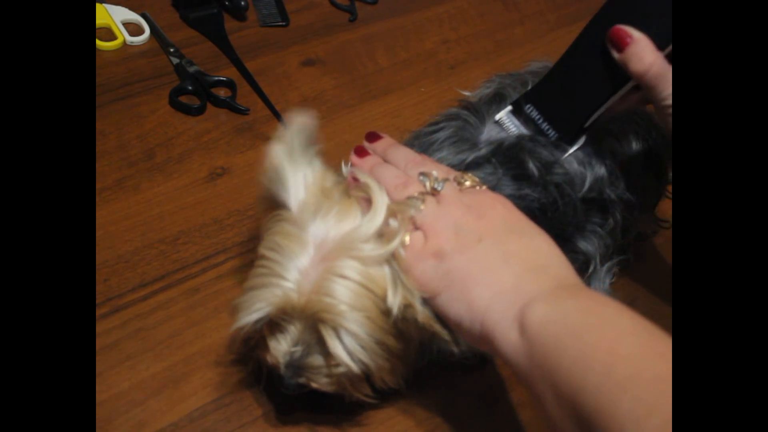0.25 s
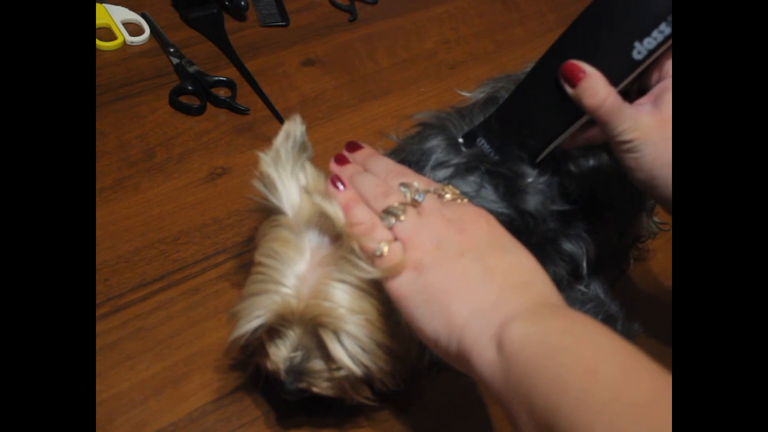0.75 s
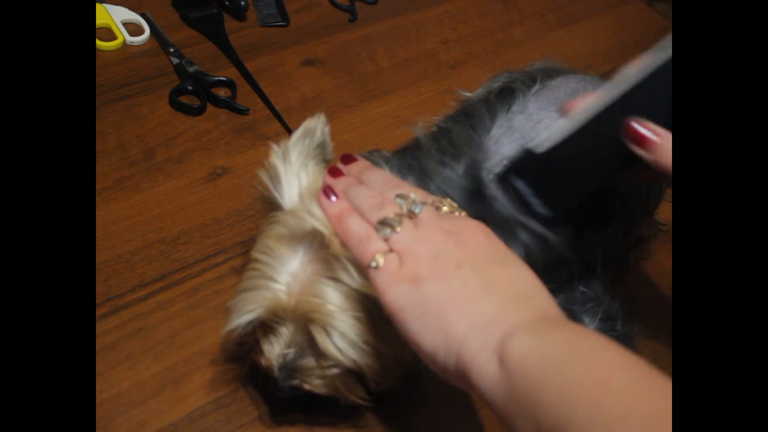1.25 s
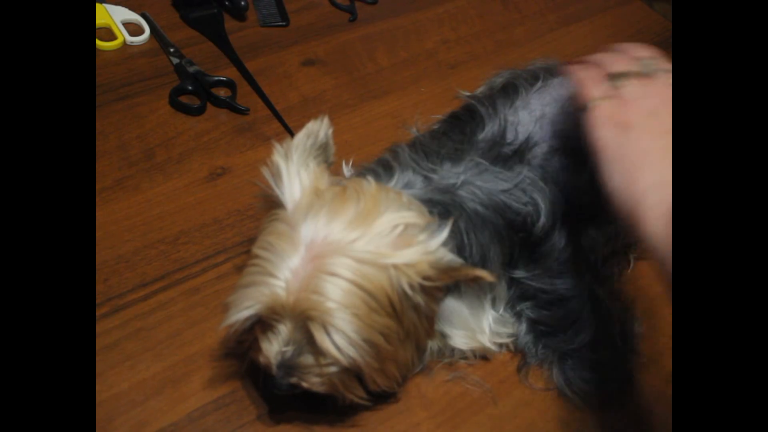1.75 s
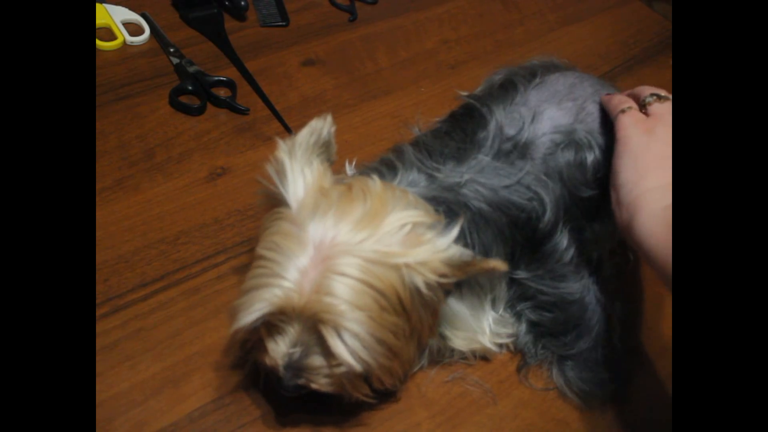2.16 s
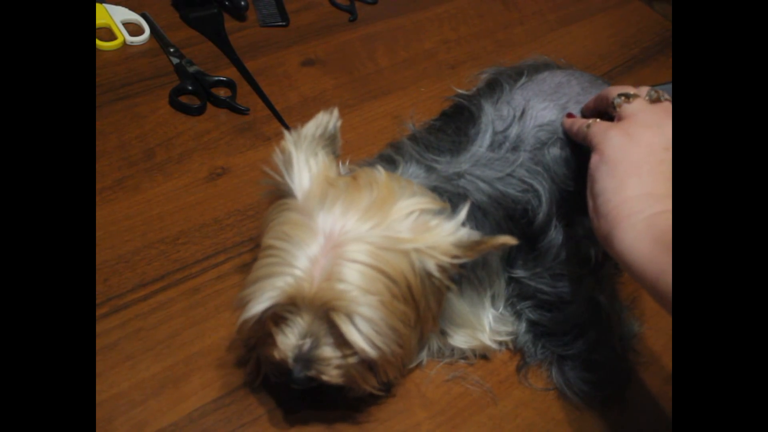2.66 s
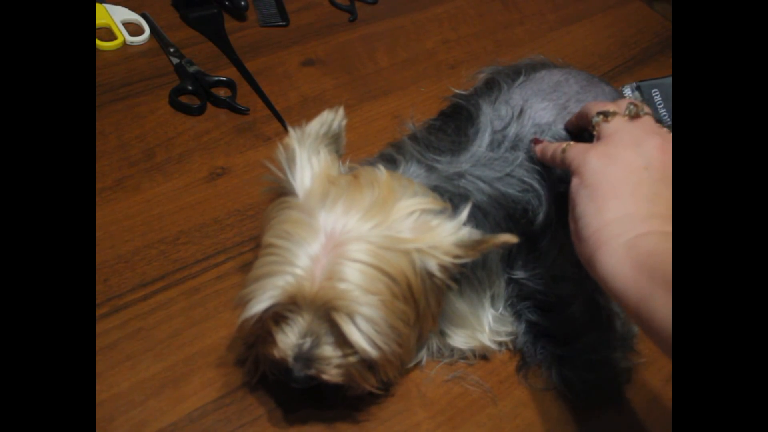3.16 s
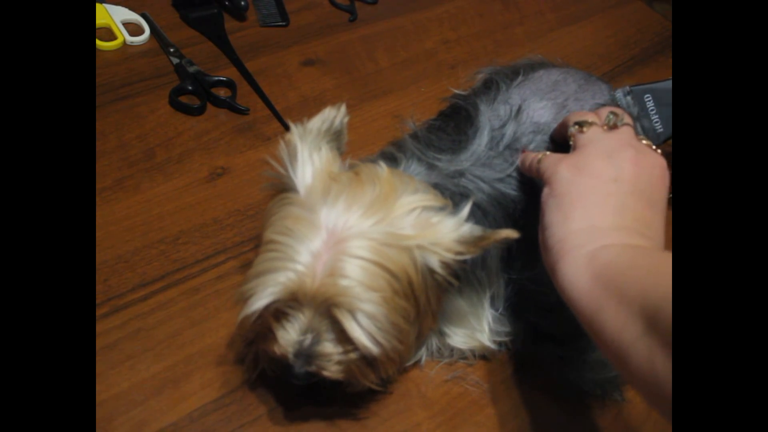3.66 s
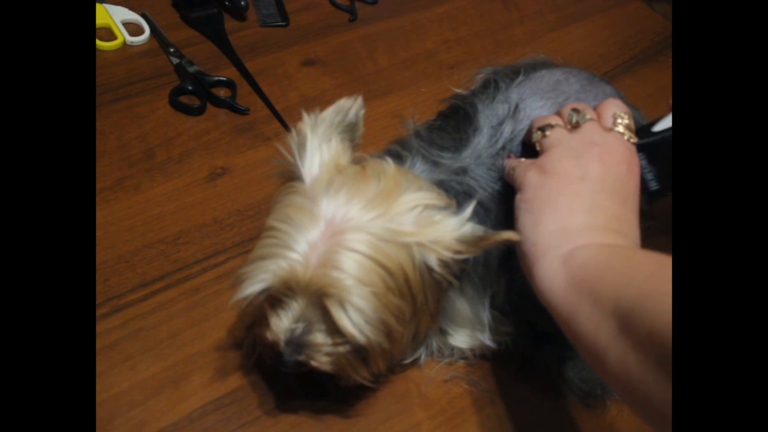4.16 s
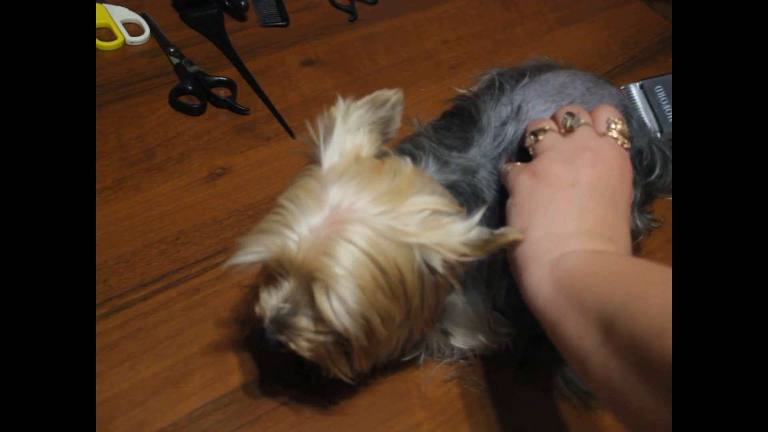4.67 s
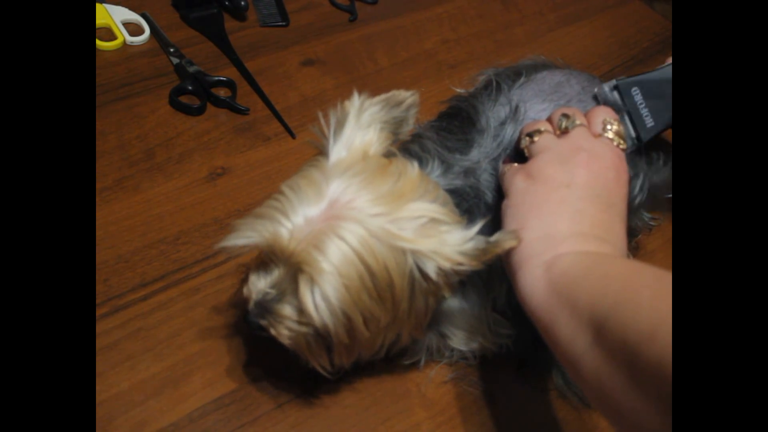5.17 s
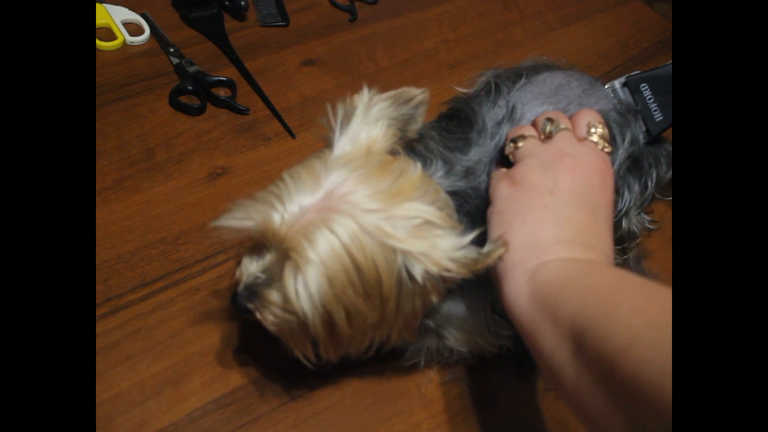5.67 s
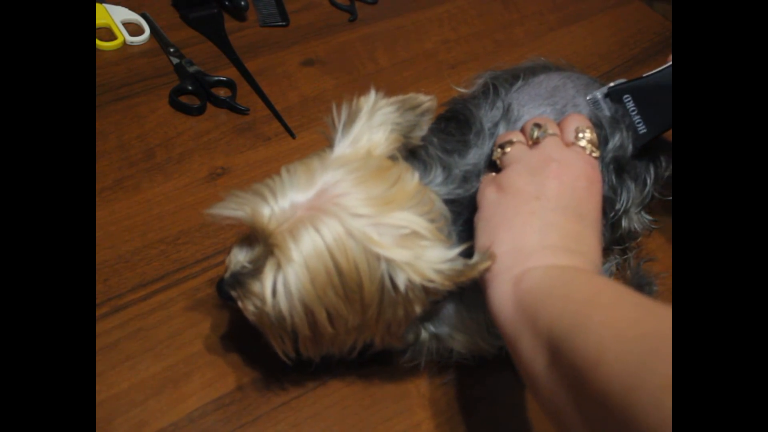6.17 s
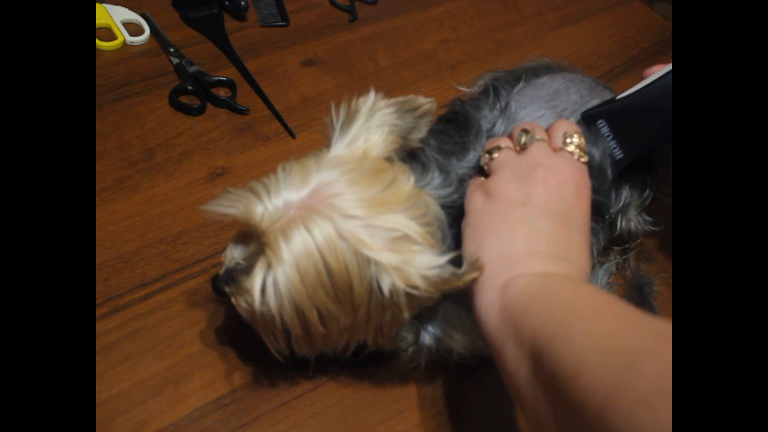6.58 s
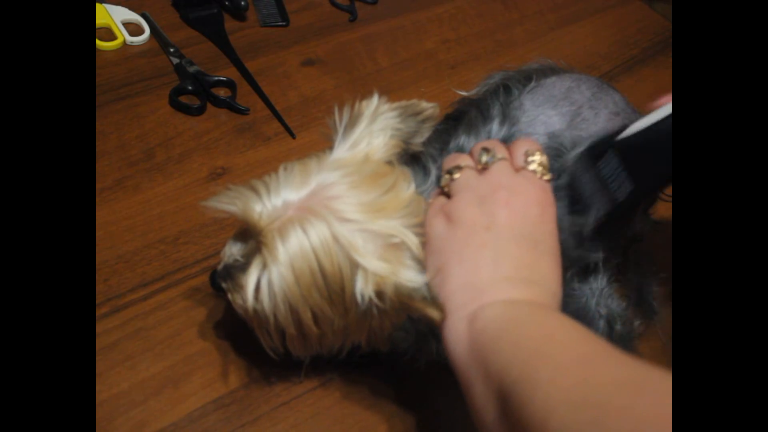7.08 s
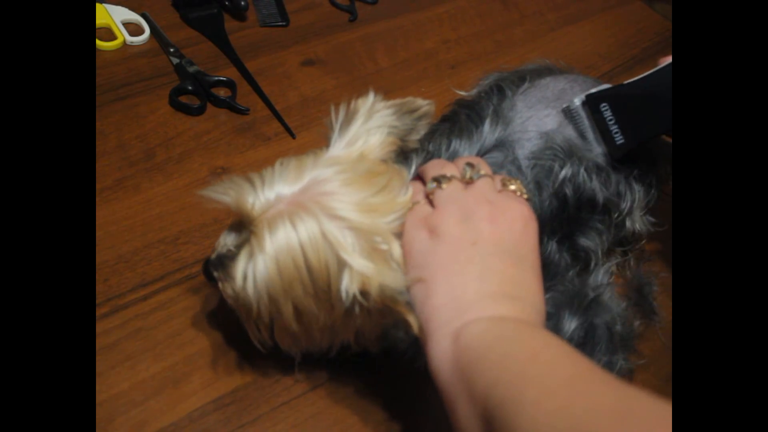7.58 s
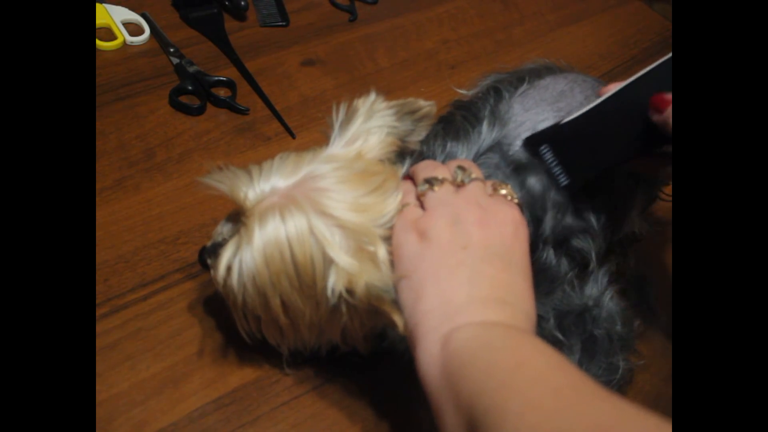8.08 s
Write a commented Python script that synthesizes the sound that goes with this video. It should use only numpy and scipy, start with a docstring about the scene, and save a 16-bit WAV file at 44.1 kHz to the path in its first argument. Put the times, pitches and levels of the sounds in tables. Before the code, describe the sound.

Close up in a quiet room, a running electric clipper shaves a small dog. A steady, slightly wavering high whine carries buzzy gear rattle and crisp blade hiss. It throbs roughly in thick hair at first, chatters loosely as it lifts, then settles into smoother pressed cutting. Near the end the whine dips and strained rattling returns, with faint soft bumps.

```python
"""An electric clipper shaves a small dog in a quiet room, heard close up; both channels are alike.
0-1.1 s: the gears whine at the tooth rate, near 1439 Hz and sagging; hard cuts in thick hair throb and rattle.
1.3-1.9 s: the loose cutter chatters and a soft bump is heard; 2.1-5.9 s: presses and cuts, bumps near 4 and 5.9 s.
6.8-8.3 s: the whine dips, strained cuts rattle again, the cutter chatters and two last bumps follow.
Throughout: wheel tones, housing and blade noise from tooth knocks and scraping, faint rumble and hum."""
import sys
import numpy as np
from scipy import signal
from scipy.fft import rfft, irfft, next_fast_len
from scipy.io import wavfile
from scipy.ndimage import uniform_filter1d, map_coordinates

SR = 44100
rng = np.random.default_rng(int(sys.argv[2]) if len(sys.argv) > 2 else 0)


def master(y):
    """Save y as 16-bit WAV."""
    cut = np.clip(np.atleast_2d(y).T, -1, 1)
    pcm = np.round(cut * 32767)  # scale
    wavfile.write(sys.argv[1], SR, pcm.astype(np.int16))


N = 367353

# motor speed, sagging under load: (time [s], tooth rate [Hz])
TOOTH_RATE = [(0.0, 1439.0), (1.08, 1436.0), (1.2, 1432.4), (1.92, 1434.5), (2.2, 1430.6), (2.96, 1427.8),
              (3.44, 1432.9), (3.72, 1428.9), (4.12, 1428.7), (4.29, 1423.4), (4.73, 1431.4),
              (5.33, 1430.4), (5.45, 1433.1), (6.29, 1428.5), (6.49, 1422.9), (7.17, 1424.0),
              (7.29, 1428.9), (8.33, 1429.9)]


def gear_mesh():
    """Teeth passed so far: the integral of the tooth rate."""
    return np.cumsum(curve(TOOTH_RATE)) / SR


# whine swells and fades as the clipper turns in the hand: (time [s], level before trim [dB])
WHINE_LEVEL = [(0.0, -27), (1.36, -22), (1.68, -30), (1.76, -22), (2.04, -20), (2.6, -28), (3.28, -21),
               (3.92, -18), (5.13, -20.5), (6.53, -19), (6.81, -24), (6.89, -35), (7.01, -23.5),
               (7.13, -33), (7.25, -23), (7.61, -22.7), (8.21, -29), (8.33, -24)]


def whine_level_db():
    """Level of the whine as the clipper turns in the hand."""
    return curve(WHINE_LEVEL)


USUAL_WHINE_DB, THROB_DB = -22.5, -29  # throb before trim, at the usual whine
THROB_PER_WHINE_DB, THROB_PER_STRAIN_DB = 0.69, 1.95  # [dB/dB]


def throb_level_db(whine_db, strain_db):
    """Throb of the blade strokes: it follows the whine and grows with strain."""
    from_whine = THROB_PER_WHINE_DB * (whine_db - USUAL_WHINE_DB)
    return THROB_DB + from_whine + THROB_PER_STRAIN_DB * strain_db


# free gears: a stroke mostly bends the whine's phase; strain skews that into level pulsing
FREE_SKEW_RAD, SKEW_RAD_PER_STRAIN_DB = 0.29, 1.2


def whine(mesh, whine_db, strain_db):
    """Tooth tone; each blade stroke holds the wheels back and lets them go, adding two side tones."""
    tooth = 2 * np.pi * mesh
    stroke = tooth / WHEEL_TEETH[0]
    skew = FREE_SKEW_RAD + SKEW_RAD_PER_STRAIN_DB * strain_db
    tone = np.sin(tooth + walk(40) / 20) * undb(whine_db + 2.45 + 0.56 * walk(25.03))
    sidebands = np.sin(tooth + stroke) - 0.79 * np.sin(tooth - stroke + skew)
    throb = sidebands * undb(throb_level_db(whine_db, strain_db) - 3.0)
    return np.sqrt(2) * (tone + throb)


# tones of uneven wheels: (teeth on the wheel, cycles per turn, level over control [dB], control)
UNEVEN_WHEEL_TONES = [(20, 4, -42, "housing"), (20, 5, -38, "housing"), (20, 7, -28.5, "housing"),
                      (20, 10, -21, "press"), (18, 11, -20, "stroke"), (22, 14, -9.5, "housing"),
                      (22, 16, -10, "housing"), (20, 16, -16, "press"), (20, 18, -36, "rattle"),
                      (29, 28, -9.5, "rattle"), (40, 39, -9, "rattle"), (40, 41, -11.5, "rattle"),
                      (29, 30, -16.5, "rattle"), (22, 24, -18, "rattle"), (20, 22, -9, "stroke"),
                      (22, 25, -19, "rattle"), (20, 23, -16, "rattle"), (22, 26, -15, "rattle"),
                      (20, 24, -14, "press"), (22, 28, -15.5, "rattle"), (22, 37, -19.5, "plate"),
                      (20, 40, -12, "plate"), (40, 81, -7.5, "plate"), (29, 59, -7, "plate"),
                      (20, 41, -15.5, "plate"), (40, 85, -21, "plate"), (20, 61, -6, "press")]


def wheel_tones(mesh, control_db):
    """Multiples of each wheel's turning rate, wavering with the part that drives or radiates them."""
    out = np.zeros(N)
    for teeth, cycles, db, control in UNEVEN_WHEEL_TONES:
        phase = 2 * np.pi * (cycles / teeth * mesh + rng.random())
        out += np.sin(phase) * undb(db + control_db[control] + 2 * walk(4.026))
    return np.sqrt(2) * out


# teeth on each wheel; the first drives the blade, one stroke a turn
WHEEL_TEETH = (20, 18, 22, 29, 40)


def tooth_knocks(mesh, repeat, memory, jitter):
    """One knock per tooth, signed by flank: flaws recur each turn, play in the teeth adds chance."""
    tooth = np.arange(1, int(mesh[-1]))
    chance = rng.standard_normal((N // 20, 2))[tooth]
    flaws = 0
    for teeth in WHEEL_TEETH:
        wheel_flaws = unit(signal.detrend(rng.standard_normal(teeth)))
        flaws = flaws + wheel_flaws[tooth % teeth] / 2
    force = repeat * flaws + chance[:, 0]
    # inertia carries a push over to the next teeth
    force = signal.lfilter([1], [1, -np.clip(memory, 0, .9)], force)
    # jitter in teeth; knocks land between samples
    at = np.clip(np.interp(tooth + jitter * chance[:, 1], mesh, np.arange(N)), 0, N - 2)
    whole, part = at.astype(int), at % 1
    early = np.bincount(whole, force * (1 - part), N)
    late = np.bincount(whole + 1, force * part, N)
    return unit(early + late)


def scrape(mesh, depth):
    """Steel sliding on steel: noise, harder at the same points of every turn of the last wheel."""
    turn = 2 * np.pi * mesh / WHEEL_TEETH[-1]
    pressure = np.zeros(N)
    for k, share in enumerate((0.2, 0.33, 0.33, 0.53, 0.46), 1):
        pressure += share * np.cos(k * turn + rng.uniform(0, 2 * np.pi))
    return unit(rng.standard_normal(N) * np.exp(depth * pressure))


# outlines of housing and gear case: (frequency [Hz], relative level [dB])
HOUSING_OUTLINE = [(100, -38), (300, -38.5), (480, -25), (600, -14), (700, -7.5), (810, -9), (940, 2),
                   (1150, -5), (1350, -26), (2000, -36)]
RATTLE_OUTLINE = [(500, -36), (1000, -16.5), (1250, -6), (1430, 1.5), (1700, -1), (2200, -1), (2600, -2),
                  (2900, -7), (3300, -1.5), (3800, -6.5), (4400, -2.5), (7000, -46)]
# blade plate modes: (frequency [Hz], nominal width [Hz], relative level [dB])
PLATE_MODES = [(2795, 200, -1), (2955, 186, 0)]


def gear_rattle(mesh, housing_db, rattle_db, plate_db):
    """Tooth knocks ring the housing; knocks with sliding noise ring the gear case and blade plate."""
    housing = colour(tooth_knocks(mesh, repeat=.5, memory=0.065, jitter=0.18), HOUSING_OUTLINE)
    knocks = tooth_knocks(mesh, repeat=0.66, memory=0.44, jitter=0.062)
    knocks = knocks + 0.49 * scrape(mesh, depth=.12)
    case = colour(knocks, RATTLE_OUTLINE) * undb(rattle_db + 2.5)
    plate = ring(knocks, PLATE_MODES) * undb(plate_db - 4.5)
    return housing * undb(housing_db - 2.5) + case + plate


# blade hiss outline: (frequency [Hz], relative level [dB])
BLADE_OUTLINE = [(2000, -35), (3500, -3), (4000, -4), (4350, 2), (4800, -7), (5300, -6.5), (5800, -6),
                 (6400, -7), (7000, -14), (8200, -12), (8750, -8), (9400, -13), (10100, -11.5),
                 (12000, -23.5), (13500, -30.5), (15000, -47)]
# modes of pressed comb and shell, and of loose cutter: (frequency [Hz], nominal width [Hz], relative level [dB])
PRESSED_MODES = [(695, 74, -5.5), (2180, 224, 1), (3164, 133, 3.5), (4325, 190, 2.5), (5720, 230, 1),
                 (8820, 280, -8.5)]
LOOSE_MODES = [(1720, 260, 1), (3170, 200, 0), (3060, 130, -2), (4330, 280, -1)]
# unloaded cutter chatters loosely: (peak time [s], length [s], level [dB])
CHATTER_SWELLS = [(1.3, 0.16, -25), (1.43, 0.11, -21.5), (1.64, 0.3, -24), (1.88, 0.12, -34),
                  (7.17, 0.14, -22), (7.75, 0.16, -32), (8.12, 0.22, -32)]


def blades(mesh, hiss_db, press_db):
    """Cutter ticks at every tooth and hisses on the comb; pressed it rings, unloaded it chatters."""
    ticks = tooth_knocks(mesh, repeat=0.61, memory=0.38, jitter=0.023)
    hiss = colour(ticks + scrape(mesh, depth=.2), BLADE_OUTLINE) * undb(hiss_db - 0.56)
    rubbing = tooth_knocks(mesh, repeat=0.99, memory=0.12, jitter=0.038)
    rubbing = rubbing + 0.78 * scrape(mesh, depth=.2)
    pressed = ring(rubbing, PRESSED_MODES) * undb(press_db + 1.0)
    chatter = ring(rubbing, LOOSE_MODES) * swells(CHATTER_SWELLS)
    return hiss + pressed + chatter


# shared opening curve, lower when the coat covers the blades: (time [s], level before offsets [dB])
OPENING = [(0.0, -28), (0.3, -28.5), (0.49, -28), (1.14, -31), (1.62, -28.5), (1.88, -28.5), (2.02, -27.5),
           (3.25, -27.5), (4.06, -30), (4.41, -30.5), (4.57, -29), (5.29, -28.5), (5.68, -27.5),
           (5.98, -29), (7.14, -27.5), (8.33, -27.5)]
BLADES_OFFSET_DB, RATTLE_OFFSET_DB, HOUSING_OFFSET_DB = 4.2, 2.5, -7  # over the opening curve
# cuts in thick hair: (start [s], end [s], plate ring before trim [dB], strain as rattle rise [dB])
THICK_CUTS = [(0, 0.246, -24.5, 2), (0.373, 1.064, -21, 2), (1.412, 1.44, -25.5, -0.5),
              (1.623, 1.677, -22, 0.5), (2.4, 3.3, -25.5, -1), (4.6, 5.9, -29.5, 0),
              (6.798, 7.18, -25.5, 1.7), (7.27, 8.02, -28.5, 1.7), (8.11, 8.26, -23.5, 1.8)]
IDLE_PLATE_DB, CUT_EDGE_S = -30, 0.13
HOUSING_PER_PLATE_DB = 0.42  # [dB/dB] the plate shakes the housing
# comb pressed on the body: (start [s], end [s], ring before trim [dB])
COMB_PRESSES = [(0, 1.35, -32), (2.15, 3.0, -26), (3.1, 3.85, -28.5), (4.6, 4.95, -29), (5.55, 5.75, -30.5),
                (7.1, 7.55, -33)]
LIGHT_TOUCH_DB, PRESS_EDGE_S = -35.5, 0.21
TREMOR_DB, TREMOR_PER_S = .35, 7  # unsteady hand


def handling():
    """Strain and levels of housing, rattle, plate, hiss and pressed ring [dB], as the coat is worked."""
    cuts, presses = np.array(THICK_CUTS), np.array(COMB_PRESSES)
    open_db = curve(OPENING) + TREMOR_DB * walk(TREMOR_PER_S)
    plate_db = holds(cuts[:, :2], cuts[:, 2], IDLE_PLATE_DB, CUT_EDGE_S)
    strain_db = holds(cuts[:, :2], cuts[:, 3], 0, CUT_EDGE_S)
    press_db = holds(presses[:, :2], presses[:, 2], LIGHT_TOUCH_DB, PRESS_EDGE_S)
    housing_db = open_db + HOUSING_OFFSET_DB + HOUSING_PER_PLATE_DB * (plate_db - IDLE_PLATE_DB)
    rattle_db = open_db + RATTLE_OFFSET_DB + strain_db
    hiss_db = open_db + BLADES_OFFSET_DB
    return strain_db, housing_db, rattle_db, plate_db, hiss_db, press_db


def disperse(x, spread_s):
    """Bending waves cross the shell at different speeds, smearing each knock."""
    size = next_fast_len(N + 4096)
    hz = np.arange(size // 2 + 1) * SR / size
    knots_hz = np.linspace(0, SR / 2, 128)
    delay_s = spread_s * np.interp(hz, knots_hz, rng.random(len(knots_hz)))
    phase = 2 * np.pi * np.cumsum(delay_s) * SR / size  # integral of delay over frequency
    return irfft(rfft(x, size) * np.exp(-1j * phase), size)[:N]


def reflect(x, floor_share, floor_lag_s, wall_share, count):
    """Echoes from floor and furniture, their lags shifting as the clipper moves; level kept."""
    n = np.arange(N)
    moved_s = 0.0001825 * walk(1.2)
    paths = [(floor_share, floor_lag_s, 1)]
    for _ in range(count):
        paths.append((wall_share, rng.uniform(.005, .03), rng.uniform(-1.96, 1.96)))
    echoes = np.zeros(N)
    for share, lag_s, sway in paths:
        echoes += share * map_coordinates(x, [n - SR * (lag_s + sway * moved_s)], order=2)
    return unit(x + echoes) * np.std(x)


# soft bumps: (peak time [s], length [s], level [dB])
BUMP_SWELLS = [(1.77, 0.15, -43.5), (3.95, 0.09, -51), (5.94, 0.084, -36.5), (7.16, .08, -53),
               (8.16, 0.11, -37.5)]
# bump outline: (frequency [Hz], relative level [dB])
BUMP_OUTLINE = [(50, -32), (130, -8.5), (250, -4), (400, -4.5), (700, 11), (1200, -11), (3000, -30)]


def bumps():
    """Dull rubs of clipper and hand against the coat: swells of filtered noise."""
    return swells(BUMP_SWELLS) * colour(rng.standard_normal(N), BUMP_OUTLINE)


# rumble outline: (frequency [Hz], relative level [dB])
ROOM_OUTLINE = [(20, 3), (70, -10), (100, -3), (150, 0), (220, -3), (400, -13), (1500, -10), (10000, -27)]
MAINS_HZ = 50


def room():
    """Faint wavering rumble of filtered noise, and a mains hum sine."""
    hum = np.sin(2 * np.pi * MAINS_HZ * np.arange(N) / SR)
    rumble = colour(rng.standard_normal(N), ROOM_OUTLINE)
    return rumble * undb(-68.5 + 1.5 * walk(4.4)) + undb(-76) * hum


def undb(db):
    """Decibels to gain."""
    return 10 ** (np.asarray(db) / 20)


def unit(x):
    """Scale to rms 1."""
    return x / np.sqrt(np.mean(x ** 2))


def curve(table):
    """Timed table, interpolated sample by sample."""
    time_s, value = np.transpose(table)
    return np.interp(np.arange(N) / SR, time_s, value)


def walk(rate_hz):
    """Smooth chance of spread near 1, drawn anew rate_hz times a second."""
    k = max(int(SR / rate_hz), 2)
    steps = np.repeat(rng.standard_normal(N // k + 1), k)
    return 1.393 * uniform_filter1d(uniform_filter1d(steps, k), k)[:N]


def colour(x, outline):
    """Filter through a (Hz, dB) outline; rms 1."""
    size = next_fast_len(N + 4096)
    hz, db = np.transpose(outline)
    f = np.maximum(np.arange(size // 2 + 1) * SR / size, 1)
    gain = undb(np.interp(np.log(f), np.log(hz), db))
    return unit(irfft(rfft(x, size) * gain, size)[:N])


def resonate(x, hz, width_hz):
    """Steep resonance: the same band-pass twice."""
    b, a = signal.iirpeak(hz, hz / width_hz, fs=SR)
    return signal.lfilter(b, a, signal.lfilter(b, a, x))


def ring(x, modes):
    """Drive a set of modes; each band-pass is twice the nominal width; rms 1."""
    return unit(sum(undb(db) * resonate(x, hz, width_hz * 2) for hz, width_hz, db in modes))


def swells(table):
    """Gaussian rise and fall per row; length is the full width at 1/e."""
    t = np.arange(N) / SR
    return sum(undb(db) * np.exp(-(2 * (t - peak_s) / length_s) ** 2) for peak_s, length_s, db in table)


def holds(spans, values, rest, edge_s):
    """Glide from rest to each span's value, hold from start to end, glide back."""
    t = np.arange(N) / SR
    gates = np.array([np.clip(1 + np.minimum(t - start, end - t) / edge_s, 0, 1) for start, end in spans])
    return rest + (values - rest) @ gates / np.maximum(gates.sum(axis=0), 1)


def scene():
    """Running clipper, bumps and room, the same in both channels."""
    mesh, whine_db = gear_mesh(), whine_level_db()
    strain_db, housing_db, rattle_db, plate_db, hiss_db, press_db = handling()
    control_db = dict(housing=housing_db, rattle=rattle_db, plate=plate_db, press=press_db,
                      stroke=throb_level_db(whine_db, strain_db))
    tones = whine(mesh, whine_db, strain_db) + wheel_tones(mesh, control_db)
    noise = gear_rattle(mesh, housing_db, rattle_db, plate_db) + blades(mesh, hiss_db, press_db)
    noise = disperse(noise, spread_s=0.00496)
    clipper = tones + reflect(noise, floor_share=0.24, floor_lag_s=.0025, wall_share=0.14, count=6)
    # so small a machine radiates almost no bass
    clipper = signal.sosfilt(signal.butter(2, 220, "high", fs=SR, output="sos"), clipper)
    return np.tile(clipper + bumps() + room(), (2, 1))


TOP_HZ = 14900


def record(dry):
    """Steep low-pass: the recorder cuts the top."""
    return signal.sosfilt(signal.ellip(10, .1, 80, TOP_HZ, fs=SR, output="sos"), dry)


dry = scene()
out = record(dry)
master(out)
```